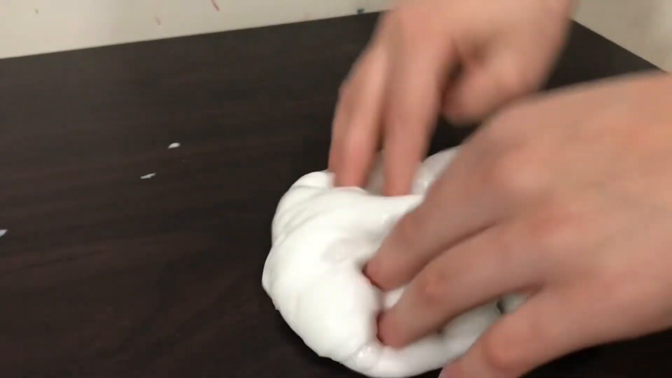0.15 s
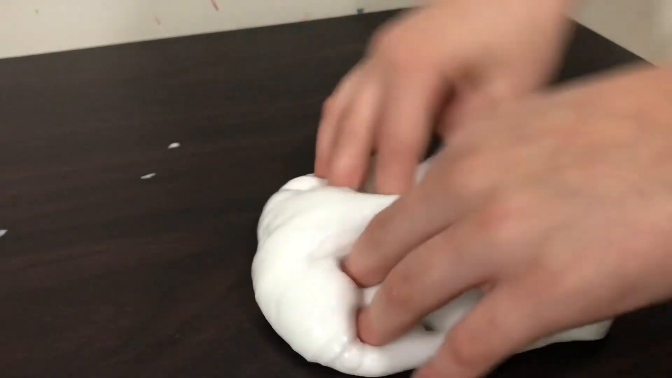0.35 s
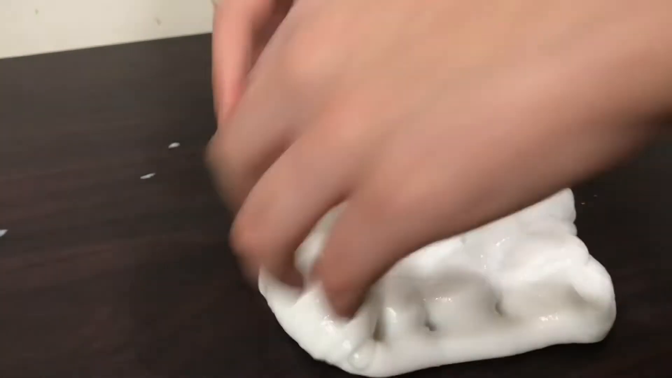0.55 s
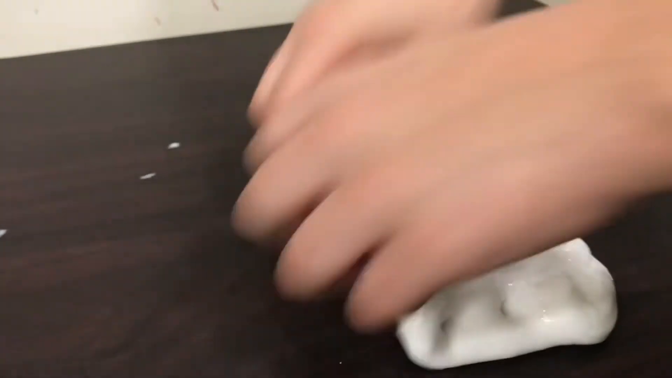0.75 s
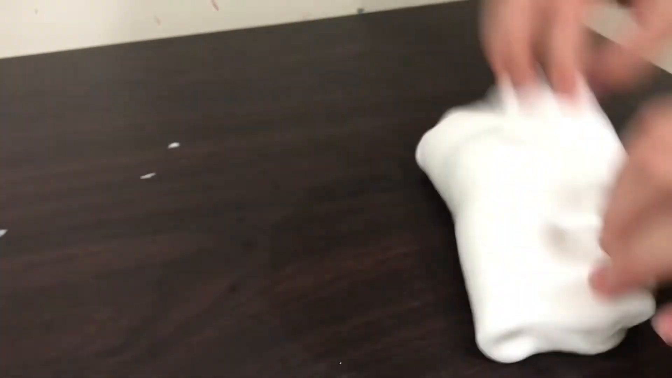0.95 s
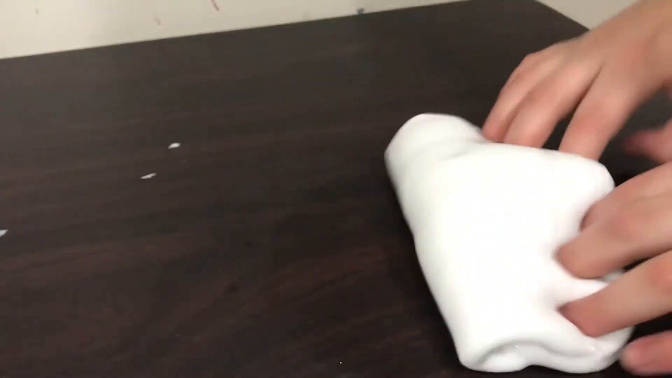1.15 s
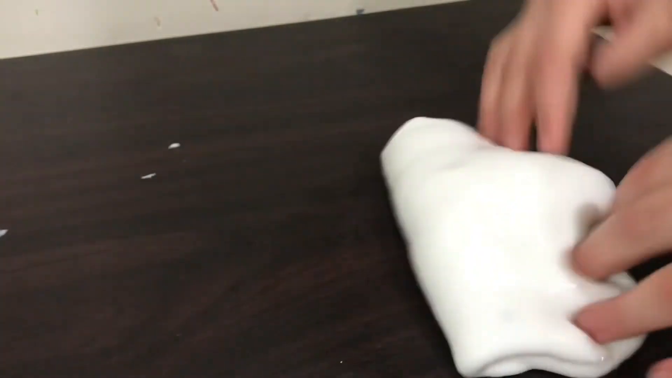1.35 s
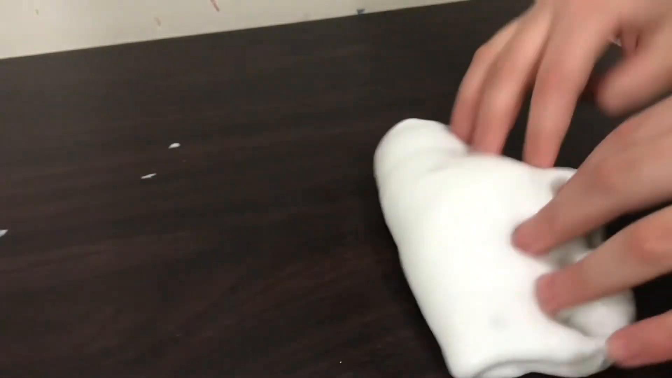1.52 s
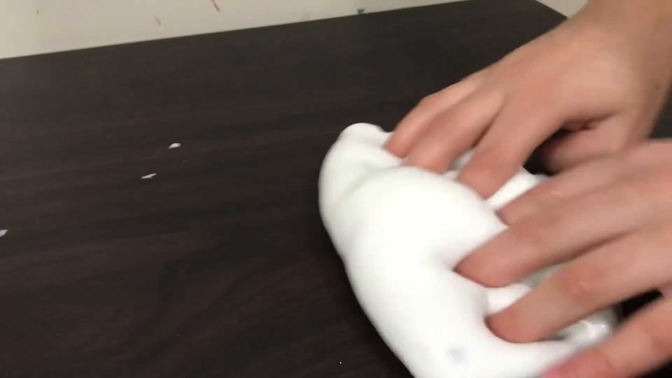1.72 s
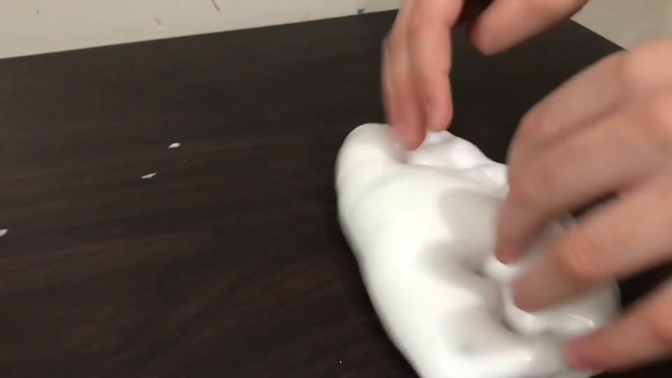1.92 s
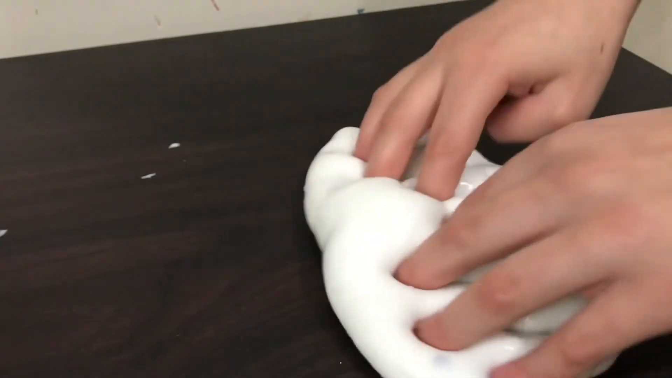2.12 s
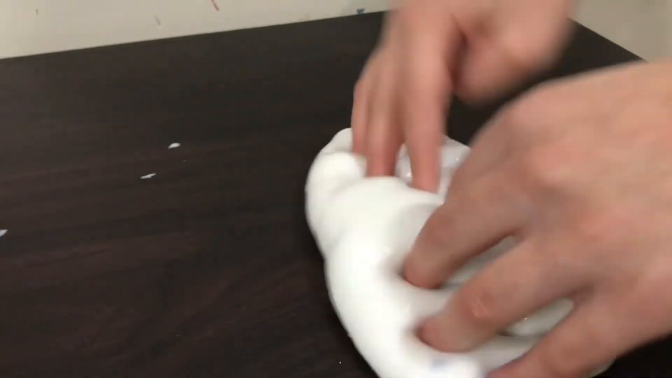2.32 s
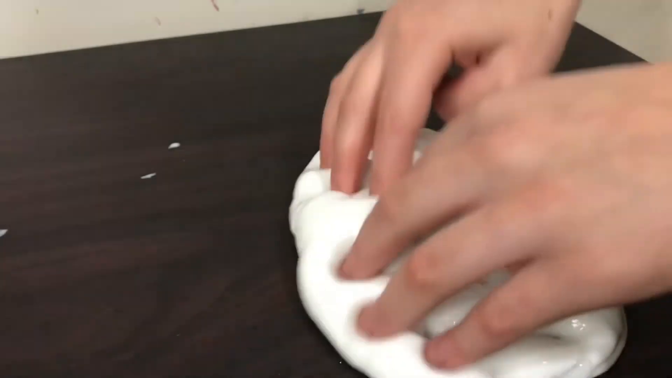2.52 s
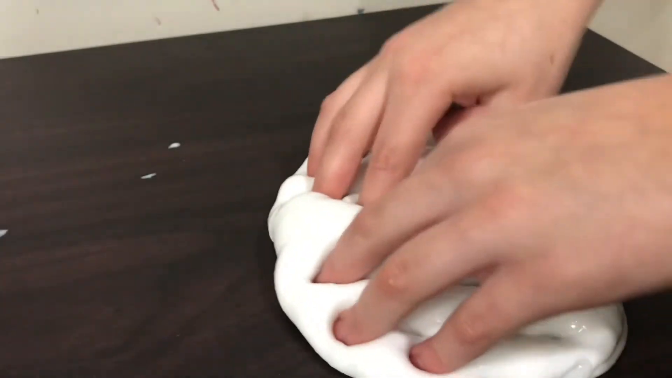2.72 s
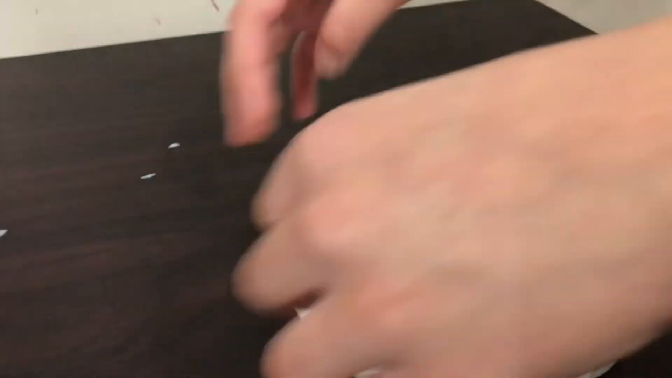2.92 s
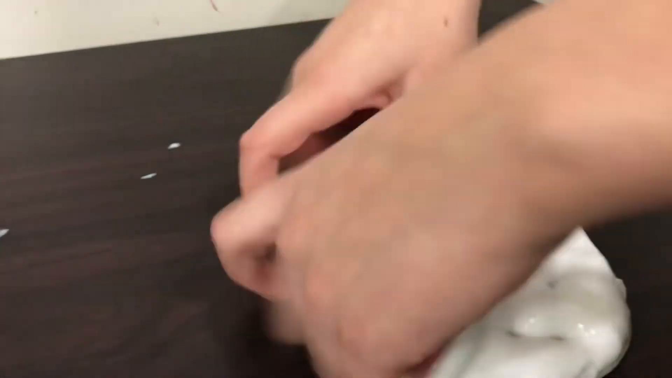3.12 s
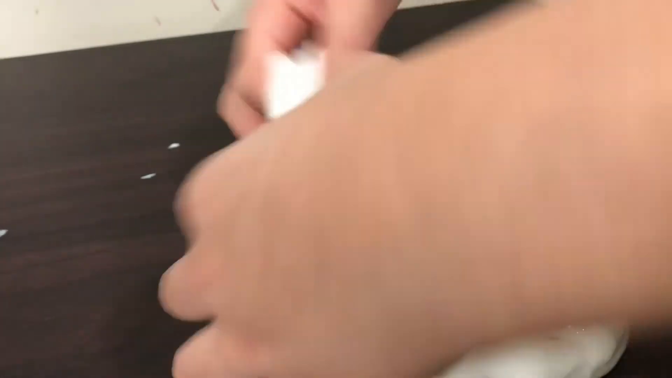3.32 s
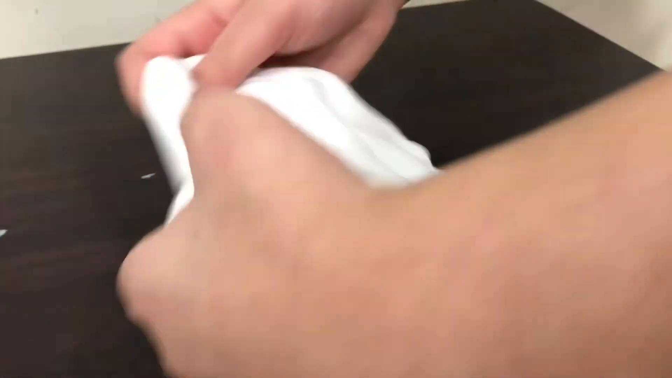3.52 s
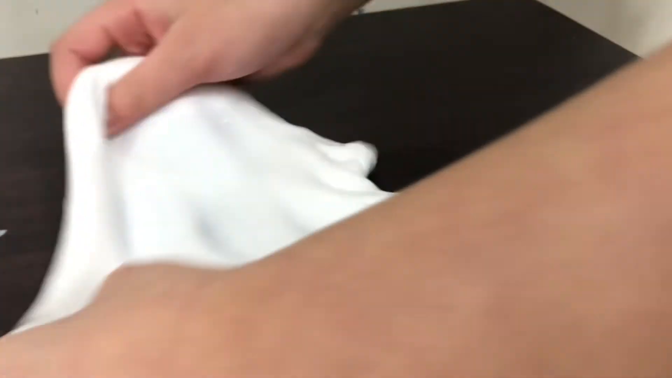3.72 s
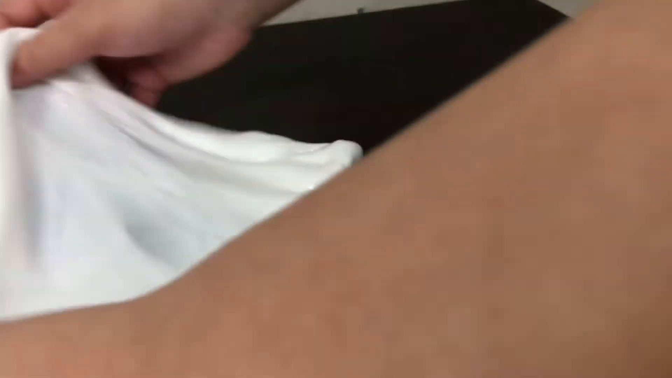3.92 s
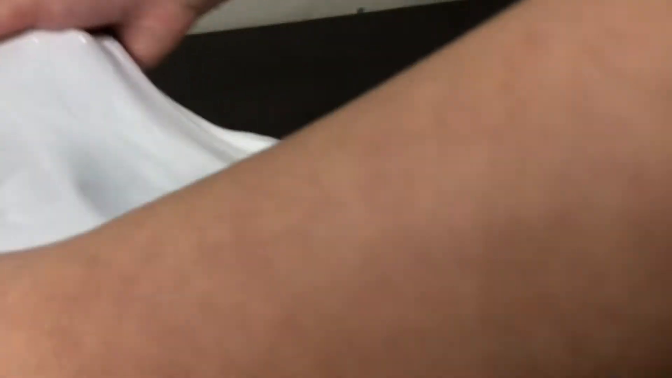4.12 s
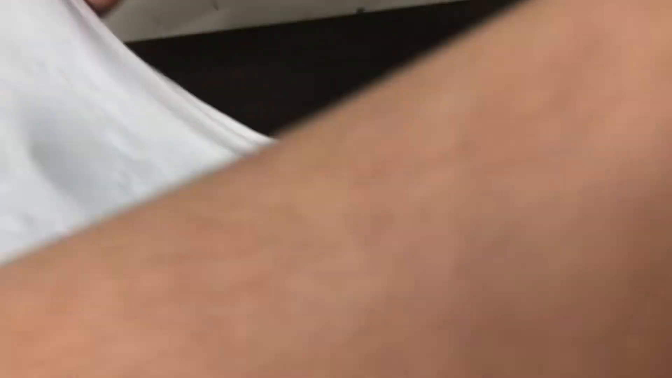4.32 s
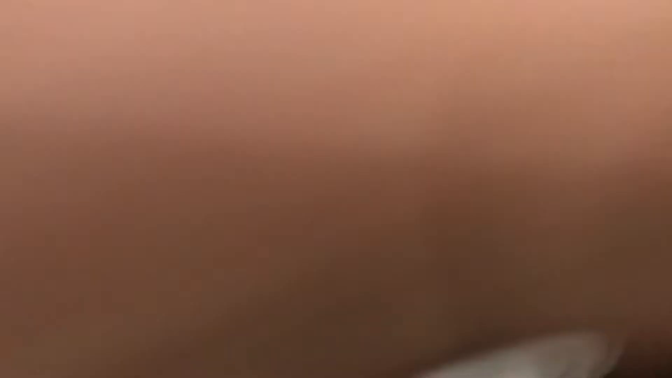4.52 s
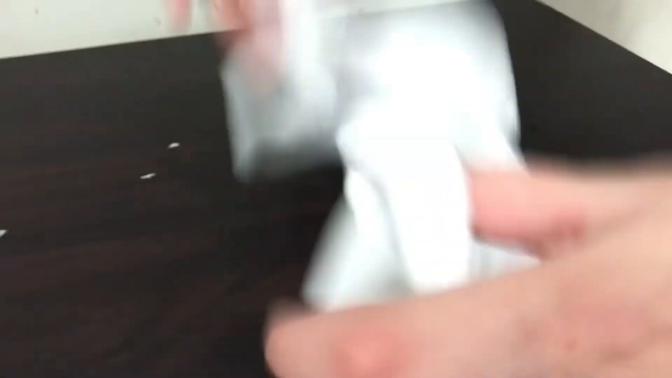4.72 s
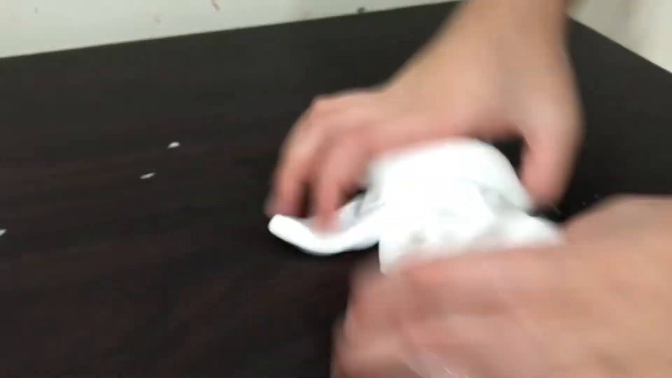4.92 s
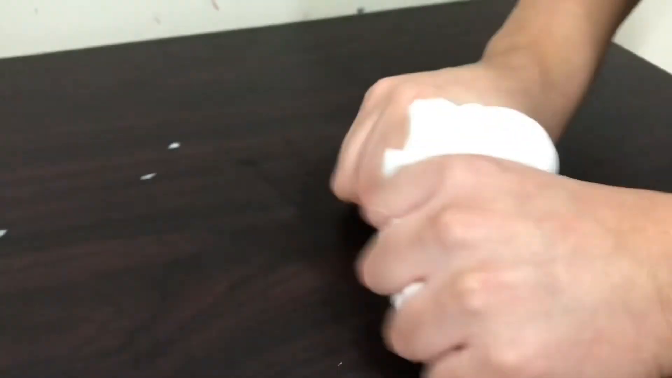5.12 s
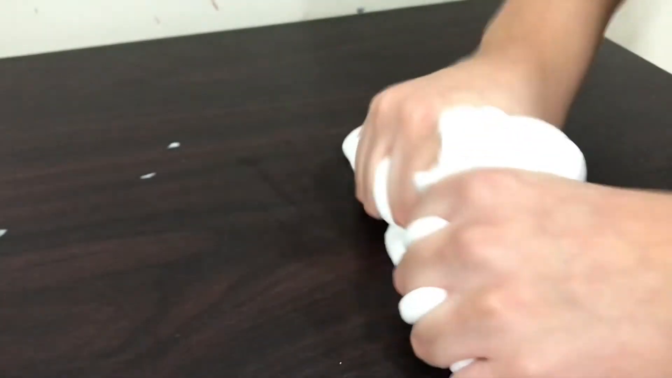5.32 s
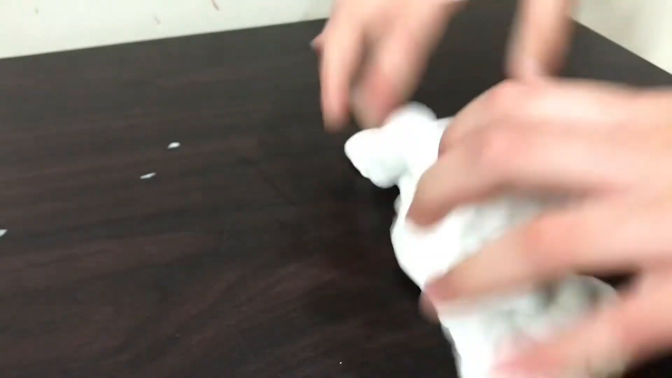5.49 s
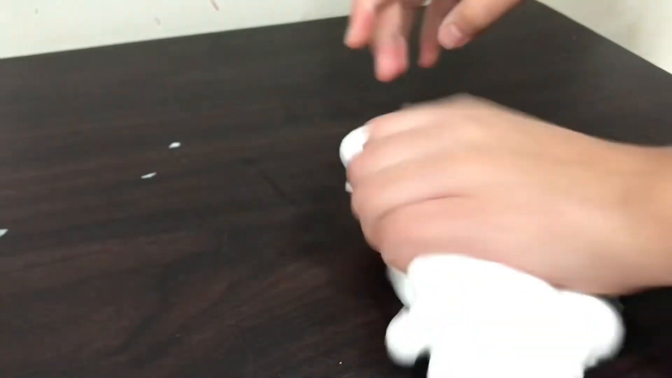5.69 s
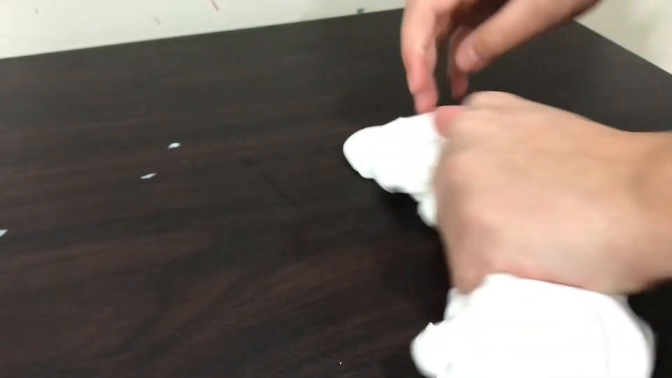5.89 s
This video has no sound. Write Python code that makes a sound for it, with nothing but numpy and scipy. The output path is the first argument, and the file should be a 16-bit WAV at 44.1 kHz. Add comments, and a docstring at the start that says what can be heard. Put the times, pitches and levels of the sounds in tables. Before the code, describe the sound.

Two hands work thick slime on a wooden table, close to the microphone in a small, slightly reverberant room. Regular pokes give brief clusters of wet pops with dull thuds. Softer bumps and a faint skin rustle follow, then a near-quiet stretch. Late squeezing brings a dense burst of sharp, snapping pops and crackle, then a few scattered clicks over low room rumble.

```python
"""Small room, wooden table: two hands poke, fold and squeeze thick slime.
Each press bursts a quick run of air pockets: damped sines under the noise of tearing, snapping film.
Cavities gurgle (sliding tone plus rasp), tiny bubbles crackle, strands snap, skin rustles and squeaks.
Fingertips, knuckles and the lump thud on the table: damped low sines with pats of noise.
A late squeeze crackles and brings the sharpest pops; room rumble and hiss lie underneath."""
import sys
import numpy as np
from scipy import signal
from scipy.fft import rfft, irfft
from scipy.io import wavfile

SR = 44100
rng = np.random.default_rng(int(sys.argv[2]) if len(sys.argv) > 2 else 0)


def store_wav(level_fs):
    """Save 16-bit WAV to argv[1]."""
    pcm = np.round(np.clip(np.atleast_2d(level_fs), -1, 1) * 32767)
    wavfile.write(sys.argv[1], SR, pcm.T.astype(np.int16))


N = 262395
TIME = np.arange(N) / SR
MS = SR / 1000  # samples per millisecond
CUTOFF_HZ = 16300

# Source levels are relative; scene() sets the balance of the layers.
# Bursts that stand out. Each row: start in seconds, pocket pitch in Hz, ring level in dB, film level in dB.
POCKET_BURSTS = [(.3935, 2430, -32, -35), (.397, 611, -37, -34), (.4137, 1450, -29, -27),
                 (.418, 1040, -24, -46), (.431, 2580, -25.5, -25.5), (.435, 1120, -23.5, -41),
                 (1.015, 1614, -41.5, -64), (1.027, 1520, -42, -80), (1.191, 1720, -38.5, -59),
                 (1.341, 2337, -31, -49), (1.3495, 1780, -32, -32.5), (1.353, 1090, -26.5, -52),
                 (1.376, 1190, -26.5, -48), (1.378, 482, -25.5, -38), (1.661, 1560, -42, -71),
                 (1.689, 1661, -45, -49.5), (1.839, 780, -26, -38), (1.8455, 3470, -30.5, -34),
                 (1.856, 3600, -38, -38), (1.872, 1080, -28, -37), (1.879, 1693, -30, -34.5),
                 (1.884, 930, -31, -33), (1.8955, 1144, -19.5, -29.5), (1.905, 2010, -30.5, -31),
                 (2.317, 1160, -24, -31), (2.3215, 1280, -27, -37), (2.33, 1150, -29, -36),
                 (2.343, 1210, -30.5, -37), (2.35, 1010, -32, -34), (2.3555, 1060, -24.5, -33),
                 (2.356, 3540, -32.5, -32.5), (2.365, 984, -22, -35), (2.376, 889, -26, -40),
                 (2.8105, 1086, -19.5, -29.5), (2.8235, 1340, -23, -36), (2.833, 1480, -35, -30.5),
                 (2.852, 3600, -35, -38), (2.855, 887, -27.5, -41), (2.8615, 1480, -23.5, -29.5),
                 (2.88, 2480, -32, -51), (2.887, 2570, -32, -51), (3.016, 900, -37, -55),
                 (3.46, 1290, -31.5, -37), (4.033, 1010, -46, -54), (4.7205, 1197, -36.5, -48),
                 (4.745, 2430, -36.5, -48), (4.766, 1220, -23, -25), (4.778, 2980, -34, -41),
                 (4.827, 2720, -40.5, -52), (4.931, 2360, -37, -58), (4.966, 1290, -34.5, -33),
                 (4.981, 1347, -27, -33.5), (5.028, 4080, -24, -36), (5.031, 2330, -29, -32),
                 (5.039, 1810, -35, -38), (5.065, 1200, -33, -34), (5.078, 1500, -25.5, -37),
                 (5.089, 1330, -26, -48), (5.095, 1950, -26, -27.5), (5.111, 1310, -30, -40),
                 (5.1173, 3640, -34, -29), (5.1246, 1970, -16.5, -20.5), (5.1355, 3890, -15, -17),
                 (5.148, 4240, -36, -31), (5.1666, 3570, -17.5, -11.5), (5.177, 3520, -34, -29),
                 (5.2425, 3770, -33, -38), (5.287, 3240, -42, -53), (5.318, 2100, -46, -64),
                 (5.366, 2470, -34, -39), (5.374, 1165, -21.5, -50), (5.38, 1700, -23, -41),
                 (5.408, 3892, -51, -34), (5.515, 3400, -46, -45), (5.707, 650, -40, -40),
                 (5.759, 2495, -29.5, -36), (5.778, 1420, -35, -24.5), (5.832, 1707, -39.5, -53)]
# Presses of the fingers into the slime. Each row: start in seconds, end in seconds, pocket level in dB,
# usual pocket pitch in Hz, crackle level in dB.
FINGER_PRESSES = [(.394, 0.433, -26, 1024, -41), (0.622, 0.669, -58, 910, -52),
                  (1.354, 1.387, -27.5, 1050, -46.5), (1.84, 1.861, -36, 709, -49),
                  (1.873, 1.913, -31, 890, -43.5), (2.315, 2.378, -34.5, 860, -44.5),
                  (2.821, 2.868, -40, 1268, -51), (4.756, 4.785, -37.5, 1300, -40),
                  (4.969, 5.044, -42, 1500, -45.5), (5.054, 5.162, -37, 1470, -40.5),
                  (5.367, 5.391, -27, 1460, -41), (5.761, 5.787, -35, 1696, -45)]
# Strands of sticky film snapping without a ring. Each row: start in seconds, lowest pitch in Hz, level in dB.
STRAND_SNAPS = [(.384, 2400, -45), (0.43, 7000, -32), (.7904, 8100, -57), (.893, 1900, -49),
                (.952, 1600, -52.5), (1.192, 1610, -41), (2.374, 6500, -36), (2.8103, 7050, -29),
                (2.8598, 7620, -34), (2.881, 7200, -23.5), (3.033, 1900, -52), (3.103, 1700, -43),
                (3.154, 6000, -42.5), (3.782, 7000, -52), (4.032, 1310, -52), (4.7214, 1278, -35),
                (4.992, 3500, -33), (5.015, 7000, -37), (5.0575, 4970, -36), (5.1495, 11000, -33),
                (5.177, 4000, -28), (5.181, 7000, -33), (5.211, 5516, -32), (5.7064, 4500, -40.5),
                (5.76, 1300, -30), (5.778, 8500, -27), (5.79, 9000, -37), (5.835, 10000, -45),
                (5.8496, 10000, -39.5)]
# Air squeezed through a cavity that changes its size. Each row: start in seconds, length in seconds,
# first pitch in Hz, last pitch in Hz, level in dB.
CAVITY_GURGLES = [(0.393, 0.021, 549, 482, -31.5), (1.338, 0.0136, 2640, 2200, -39.5),
                  (1.354, 0.027, 1250, 1025, -32.5), (1.385, 0.016, 520, 665, -35.5),
                  (1.902, 0.014, 2104, 1830, -35), (1.906, .018, 643, 555, -34),
                  (2.365, 0.017, 700, 547, -35.5), (2.832, 0.017, 1300, 1080, -27),
                  (2.851, 0.0164, 1207, 1610, -31), (4.793, 0.018, 1550, 1840, -41),
                  (4.969, 0.016, 1910, 1640, -36), (4.98, 0.021, 510, 570, -40.5),
                  (5.122, 0.0229, 540, 796, -31), (5.15, 0.0216, 1263, 1115, -27)]
# Fingertips, hands and lump landing on the table. Each row: start in seconds, pitch in Hz, level in dB.
TABLE_THUDS = [(0.394, 334, -22), (0.413, 377, -25), (.434, 248, -23.5), (.626, 205, -16), (.636, 179, -14),
               (.652, 140, -15), (0.659, 125, -22), (.672, 120, -28), (1.341, 325, -35.5),
               (1.352, 410, -27.5), (1.377, 327, -26), (1.848, 181, -24.5), (1.877, 294, -27),
               (1.896, 381.8, -35), (2.323, 384.8, -22), (2.348, 277, -31), (2.37, 366, -26.5),
               (2.811, 410, -26.5), (2.8354, 310, -20.5), (2.884, 194, -27.5), (2.994, 125, -26),
               (3.016, 216, -19), (3.034, 180, -20), (3.04, 79.6, -22.5), (3.104, 243, -23),
               (3.109, 88, -22), (3.119, 192, -29.5), (3.184, 195, -35), (4.032, 200, -36),
               (4.767, 262, -18), (4.782, 71.5, -21.5), (4.906, 260.4, -30.5), (5.001, 76.5, -23.5),
               (5.022, 294, -26), (5.094, 427, -29), (5.124, 500, -25), (5.377, 194, -21.5),
               (5.672, 92, -31.5)]
# Skin sliding over the slime and peeling off. Each row: start in seconds, end in seconds, rustle level in dB,
# sticky crackle level in dB.
SKIN_SLIDES = [(0.369, 0.394, -56, -60), (1.327, 1.347, -56, -63), (1.822, 1.842, -58, -64),
               (0.661, 1.047, -74, -76.5), (2.983, 3.236, -56, -63.5), (3.242, 3.636, -70, -73),
               (3.766, 4.187, -82, -80), (4.68, 4.859, -58, -61), (4.907, 4.991, -56, -55),
               (5.165, 5.386, -60, -69), (5.351, 5.439, -40, -49), (5.461, 5.868, -63.5, -67)]
# Colour of the sliding. Each row: frequency in Hz, relative density in dB per Hz.
RUSTLE_COLOUR = [(300, 8), (1200, 3.5), (2500, 0.5), (3800, 0.5), (6000, -7), (7500, -20), (15000, -13)]
# Resonances of the board under the slime. Each row: frequency in Hz, width in Hz, relative level in dB.
BOARD_MODES = [(545.5, 61, -2), (669, 18, -5.5), (1940, 620, -20), (3230, 350, -13.5), (3830, 190, -11.5),
               (5500, 1000, -11.5)]
# Room decay. Each row: frequency in Hz, T60 in seconds.
ROOM_DECAY = [(100, 0.3), (200, 0.62), (400, 0.71), (1000, 0.67), (2800, 0.62), (7000, 0.37), (15000, 0.26)]
# Strength of the reverberation. Each row: frequency in Hz, level in dB.
ROOM_STRENGTH = [(60, -1), (190, -9.5), (400, -10.5), (1000, -15), (3000, -15), (6000, -10), (15000, -16)]
# Low room resonances, stirred by rumble and thuds. Each row: frequency in Hz, width in Hz, relative level in dB.
ROOM_MODES = [(69, 80, -55), (119, 6.6, -59.5), (188, 12.7, -55), (318, 180, -64.5)]
# Colour of the steady rumble and hiss. Each row: frequency in Hz, relative density in dB per Hz.
AIR_COLOUR = [(15, -58), (25, -21), (48, -2), (130, -1), (161, -8.5), (195, -1.5), (229, -12), (285, -1.5),
              (405, -9), (1100, -26), (1230, -32), (1610, -29.5), (2000, -32.5), (2760, -34.5),
              (16000, -49.5)]
# Colour of the echo of an earlier press. Each row: frequency in Hz, relative density in dB per Hz.
LINGER_COLOUR = [(100, 11.5), (600, 0.5), (1200, -4.5), (2200, -8), (4000, -18.5), (8000, -29),
                 (16000, -38)]

# run of bursts inside a press
POCKET_GAP_S, POCKET_SPREAD_OCTAVES, POCKET_SPREAD_DB = .011, 0.273, 2.5
PRESS_CLIMB_OCTAVES, PRESS_SWELL_DB = 0.04, 0.5
# film level relative to the ring of a 1 kHz pocket
POCKET_FILM_DB, FILM_SPREAD_DB, FILM_DB_PER_OCTAVE = -25, 3, 20.5
SMACK_DB, PAT_DB = 1, -4  # goo beside a ring (faint pockets less), flesh beside a thud
PRESS_TILT_DB_PER_OCTAVE, PEEL_TILT_DB_PER_OCTAVE = -4, -0.5  # crackle inside the lump, at its surface
SQUEAK_START_S, SQUEAK_END_S, SQUEAK_HZ, SQUEAK_WIDTH_HZ, SQUEAK_DB = 3.1, 3.69, 1670, 100, -67.5
DELAY_JITTER_S = .00006  # spread of the random delay that smooths the reverberation
AIR_DB, LINGER_DB, LINGER_T60_S = -51.5, -39.5, 0.68


def from_db(db):
    """Decibels to gain."""
    return 10 ** (np.asarray(db) / 20)


def rms_one(x):
    """Scale to rms 1."""
    return x / np.sqrt(np.mean(x ** 2) + 1e-20)


def unit_burst(x):
    """Scale to the energy of one millisecond at rms 1."""
    return x * np.sqrt(MS / (np.sum(x ** 2) + 1e-20))


def at_hz(points, hz):
    """Read a table on a log-frequency axis."""
    known_hz, values = np.transpose(points)
    return np.interp(np.log(np.maximum(hz, 1)), np.log(known_hz), values)


def band(x, low_hz, high_hz, order=2):
    """Causal band-pass."""
    edges_hz = [low_hz, min(high_hz, .47 * SR)]
    return signal.sosfilt(signal.butter(order, edges_hz, "band", fs=SR, output="sos"), x + 1e-18)


def resonate(x, hz, width_hz):
    """One resonance with gain 1 at its peak."""
    r = np.exp(-np.pi * width_hz / SR)
    zeros = np.array([1, 0, -1]) * (1 - r * r) / 2
    poles = [1, -2 * r * np.cos(2 * np.pi * hz / SR), r * r]
    return signal.lfilter(zeros, poles, x + 1e-18)


def noise(colour):
    """Steady noise of the given colour, rms 1."""
    white = rfft(rng.standard_normal(N))
    hz = np.arange(len(white)) * SR / N
    return rms_one(irfft(white * from_db(at_hz(colour, hz)), N))


def add(track, start_s, sound):
    """Mix a sound into the track at start_s."""
    start = int(start_s * SR)
    track[start:start + len(sound)] += sound[:N - start]


def swell(start_s, end_s):
    """Pressure of one stroke: it builds and lets go."""
    n = int(max(end_s - start_s, .01) * SR)
    return np.sqrt(np.sin(np.pi * (np.arange(n) + .5) / n))


def ring(t, hz, decay_s, rise_s, glide):
    """Damped sine whose pitch slides by the share glide as it dies."""
    pitch_hz = hz * (1 + glide * (.5 - np.exp(-t / decay_s)))
    envelope = np.exp(-t / decay_s) * (1 - np.exp(-t / rise_s))
    return unit_burst(np.sin(2 * np.pi * np.cumsum(pitch_hz) / SR) * envelope)


def rupture(t, length_s, violence=0, grain_db=2.0):
    """A film gives way at t = 0 and its rips fade; violence shortens the swell and strengthens the crack."""
    rips = rng.standard_normal(len(t)) * from_db(grain_db * rng.standard_normal(len(t)))
    swell_s = length_s * (.35 - .3 * violence)
    rips = unit_burst(rips * np.exp(-np.abs(t) / np.where(t < 0, swell_s, length_s)))
    rips[np.argmin(np.abs(t))] += np.sqrt(MS) * (.25 + .55 * violence)
    return rips


def press_pockets(count=24):
    """Small pockets burst at uneven gaps during a press, slightly higher and louder on average towards its end."""
    rows = []
    for start_s, end_s, level_db, usual_hz, _ in FINGER_PRESSES:
        s = start_s + POCKET_GAP_S * (np.arange(count) + .5 * rng.random(count))
        pitch, strength, film = np.clip(rng.standard_normal((3, count)), -2, 2)
        progress = (s - start_s) / (end_s - start_s)
        climb_octaves = PRESS_CLIMB_OCTAVES * (np.minimum(progress, 1) - .5)
        hz = usual_hz * 2 ** (POCKET_SPREAD_OCTAVES * pitch + climb_octaves)
        ring_db = level_db + POCKET_SPREAD_DB * strength + PRESS_SWELL_DB * progress
        # small, high pockets lie near the surface and snap more brightly
        film_db = ring_db + POCKET_FILM_DB + FILM_DB_PER_OCTAVE * np.log2(hz / 1000) + FILM_SPREAD_DB * film
        rows += list(np.transpose([s, hz, ring_db, film_db])[s < end_s])
    return rows


def pops(decay_at_1khz_s=0.0046, rise_s=0.00017, glide=0.11, glide_spread=0.25, tear_s=0.0035,
         soft_top_hz=4300, hard_top_hz=6000, soft_tear_db=-1.0, hard_tear_db=-3.5,
         snap_db=-3.0, snap_low_hz=7900, snap_spread_octaves=0.33, lead_s=.006):
    """A pocket rings at its own pitch, rising on average, small ones more briefly, under its bursting film."""
    out, t = np.zeros(N), TIME[:int(30 * MS)]
    for s, hz, ring_db, film_db in list(POCKET_BURSTS) + press_pockets():
        # loud films burst more abruptly; their tear reaches higher but is weaker relative to the film level
        violence = np.interp(film_db, [-33, -14], [0, 1])
        tear_top_hz = soft_top_hz + violence * (hard_top_hz - soft_top_hz)
        tear_db = soft_tear_db + violence * (hard_tear_db - soft_tear_db)
        decay_s = decay_at_1khz_s * np.sqrt(1000 / hz)
        pocket = ring(t, hz, decay_s, rise_s, glide + glide_spread * rng.standard_normal())
        # the jolted goo smacks in a wide band around the pitch
        smack = unit_burst(band(rupture(t - lead_s, decay_s, violence), hz / 3.06, hz * 1.6, order=3))
        film = rupture(t - lead_s, tear_s, violence)
        tear = unit_burst(band(film, 1310, tear_top_hz, order=4))
        # each film snaps in a treble band of its own
        snap_hz = snap_low_hz * 2 ** (snap_spread_octaves * rng.uniform(-1.33, 1))
        snap = unit_burst(band(film, min(snap_hz, 13000), 2 * snap_hz))
        # faint pockets hardly jolt the goo and ring more purely
        smack_db = SMACK_DB + np.interp(ring_db, [-44, -30], [-7, 0])
        burst = from_db(ring_db + smack_db) * smack
        burst = burst + from_db(film_db + tear_db) * tear
        burst = burst + from_db(film_db + snap_db) * snap
        add(out, s, from_db(ring_db) * pocket)
        add(out, s - lead_s, burst)
    return out


def crackle(strokes, tilt_db_per_octave, bubbles_per_s, size_db=6.0, cycles=3.45, low_hz=800, high_hz=4200,
            rise_s=.0001, glide=0.34, tick_db=-8.0, tick_s=0.00059, count=16):
    """Tiny bubbles collapse at random under each stroke: each ticks broadly and rings for a few cycles."""
    out, t = np.zeros(N), TIME[:int(20 * MS)]
    blips = []
    for hz in np.geomspace(low_hz, high_hz, count):
        tick = unit_burst(band(rupture(t, tick_s), 2500, 8500))
        blips.append(ring(t, hz, cycles / hz, rise_s, glide) + from_db(tick_db) * tick)
    for start_s, end_s, level_db in strokes:
        pressure = swell(start_s, end_s)
        shape = (count, len(pressure))
        born = rng.random(shape) < bubbles_per_s * pressure / count / SR
        sizes = from_db(size_db * np.minimum(rng.exponential(1, shape), 3)) * rng.choice([-1, 1], shape)
        fizz = sum(signal.fftconvolve(clicks * pressure, blip) for clicks, blip in zip(born * sizes, blips))
        # bubbles buried deep in the lump sound duller
        octaves = np.log2(np.maximum(np.fft.rfftfreq(len(fizz), 1 / SR), low_hz) / low_hz)
        tilted = irfft(rfft(fizz) * from_db(tilt_db_per_octave * octaves))
        add(out, start_s, from_db(level_db) * rms_one(tilted))
    return out


def gurgles(flutter_s=0.00179, flutter_db=3.5, waver=0.07, rasp=0.54):
    """Escaping air rings a cavity; pitch slides as the fingers reshape it, its wet neck flutters and rasps."""
    out = np.zeros(N)
    for s, length_s, first_hz, last_hz, level_db in CAVITY_GURGLES:
        flow = swell(s, s + length_s)
        t = TIME[:len(flow)]
        loud, bend = (np.interp(t / flutter_s, np.arange(40), steps) for steps in rng.standard_normal((2, 40)))
        pitch_hz = np.geomspace(first_hz, last_hz, len(t)) * (1 + waver * bend)
        tone = rms_one(np.sin(2 * np.pi * np.cumsum(pitch_hz) / SR))
        hiss = rng.standard_normal(len(t))
        sputter = rms_one(band(hiss, pitch_hz.min() / np.sqrt(2), pitch_hz.max() * np.sqrt(2)))
        voice = flow * from_db(flutter_db * loud) * (tone + rasp * sputter)
        add(out, s, from_db(level_db) * rms_one(voice))
    return out


def snaps(length_s=0.0013, violence=0.55, span_octaves=1.63):
    """A thin strand parts with one crack and a very short fizz; the finer the strand, the higher its band."""
    out, t = np.zeros(N), TIME[:int(12 * MS)]
    for s, low_hz, level_db in STRAND_SNAPS:
        top_hz = min(low_hz * 2 ** span_octaves, CUTOFF_HZ)
        fizz = band(rupture(t, length_s, violence), low_hz, top_hz, order=3)
        add(out, s, from_db(level_db) * unit_burst(fizz))
    return out


def thuds(cycles=0.78, rise_s=0.000043, glide=-0.4, flesh_s=0.0078, flesh_low_hz=100, flesh_top_hz=260,
          slap_s=0.0053, slap_low_hz=290, slap_top_hz=640, slap_db=-11,
          skin_s=0.0066, skin_top_hz=3000, skin_db=-24, sway_hz=72, sway_db=-15):
    """A blow rocks the table briefly and sways its frame, with a pat of flesh, a wet slap and a tick of skin."""
    out, t = np.zeros(N), TIME[:int(120 * MS)]
    for s, hz, level_db in TABLE_THUDS:
        pat = unit_burst(band(rupture(t, flesh_s), flesh_low_hz, flesh_top_hz, order=3))
        slap = unit_burst(band(rupture(t, slap_s), slap_low_hz, slap_top_hz))
        skin = unit_burst(band(rupture(t, skin_s, violence=0.94), slap_top_hz, skin_top_hz))
        contact = from_db(PAT_DB) * pat + from_db(slap_db) * slap + from_db(skin_db) * skin
        knock = ring(t, hz, cycles / hz, rise_s, glide)
        sway = from_db(sway_db) * ring(t, sway_hz, 1 / sway_hz, flesh_s, glide)
        add(out, s, from_db(level_db) * (knock + contact + sway))
    return out


def slides():
    """Skin rubbing along the slime: a soft continuous rustle of coloured noise."""
    force = np.zeros(N)
    for start_s, end_s, level_db, _ in SKIN_SLIDES:
        add(force, start_s, from_db(level_db) * swell(start_s, end_s) ** 2)
    return force * noise(RUSTLE_COLOUR)


def squeak(catch_s=.02, catch_db=-0.5):
    """Skin dragging on the stretched slime sings faintly in one narrow band, its level wavering slightly."""
    force = np.zeros(N)
    add(force, SQUEAK_START_S, swell(SQUEAK_START_S, SQUEAK_END_S))
    grip = np.interp(TIME / catch_s, np.arange(2000), rng.standard_normal(2000))
    voice = resonate(rng.standard_normal(N), SQUEAK_HZ, SQUEAK_WIDTH_HZ)
    return from_db(SQUEAK_DB) * force * rms_one(voice * from_db(catch_db * np.clip(grip, -2, 1)))


def table_top(x, ring_db=9.5):
    """The board's resonances ring along with the slime."""
    modes = sum(from_db(db) * resonate(x, hz, width_hz) for hz, width_hz, db in BOARD_MODES)
    return x + from_db(ring_db) * modes


def room(x, build_s=0.0029, count=10):
    """Diffuse reflections build up quickly and die away at a rate of their own in each band."""
    t, response = TIME[:SR * 3 // 4], 0
    edges_hz = np.geomspace(45, 18000, count + 1)
    for low_hz, high_hz in zip(edges_hz, edges_hz[1:]):
        hz = np.sqrt(low_hz * high_hz)
        fade = from_db(-60 * t / at_hz(ROOM_DECAY, hz)) * (1 - np.exp(-(t / build_s) ** 2))
        tail = band(rng.standard_normal(len(t)), low_hz, high_hz) * fade
        # energy in proportion to bandwidth
        scale = np.sqrt(2 * (high_hz - low_hz) / SR / np.sum(tail ** 2))
        response = response + tail * from_db(at_hz(ROOM_STRENGTH, hz)) * scale
    return signal.fftconvolve(x, response)[:N]


def smooth_room(x, count=4):
    """Four diffuse room tails, each fed with a slightly randomly jittered delay, blend into one smooth reverb."""
    def jittered():
        """The sound with its delay wandering every millisecond."""
        steps = rng.standard_normal(int(N / MS) + 2)
        jitter = np.interp(np.arange(N) / MS, np.arange(len(steps)), steps)
        return np.interp(TIME - DELAY_JITTER_S * jitter, TIME, x)
    return sum(room(jittered()) for _ in range(count)) / np.sqrt(count)


def background():
    """Room rumble and hiss, a few booming resonances, and the dying echo of an earlier press."""
    drone = 0
    for hz, width_hz, db in ROOM_MODES:
        settled = resonate(rng.standard_normal(N + SR), hz, width_hz)[SR:]
        drone = drone + from_db(db) * rms_one(settled)
    linger = from_db(LINGER_DB - 60 * TIME / LINGER_T60_S) * noise(LINGER_COLOUR)
    return from_db(AIR_DB) * noise(AIR_COLOUR) + band(drone, 40, 440) + linger


def scene(pop_db=-4.5, gurgle_db=-6.0, snap_db=-4.5, thud_db=2.5, boom_db=-20.0, boom_delay_s=0.061):
    """Slime and table close to the microphone, the room around them."""
    press_strokes = [(start_s, end_s, db) for start_s, end_s, *_, db in FINGER_PRESSES]
    peel_strokes = [(start_s, end_s, db) for start_s, end_s, _, db in SKIN_SLIDES]
    crushed = crackle(press_strokes, PRESS_TILT_DB_PER_OCTAVE, bubbles_per_s=1000)
    peeled = crackle(peel_strokes, PEEL_TILT_DB_PER_OCTAVE, bubbles_per_s=330)
    bursts = from_db(pop_db) * pops() + from_db(gurgle_db) * gurgles() + from_db(snap_db) * snaps()
    slime = table_top(bursts + crushed + peeled)
    blows = from_db(thud_db) * thuds()
    rustle = slides() + squeak()
    # standing waves need a trip across the room before they boom
    late_blows = np.interp(TIME - boom_delay_s, TIME, blows)
    boom = sum(resonate(late_blows, hz, width_hz) for hz, width_hz, _ in ROOM_MODES)
    direct = slime + blows + rustle
    echoes = smooth_room(slime) + room(blows + rustle)
    return (direct + echoes + from_db(boom_db) * boom + background())[None]


def record(dry, dip_hz=4600, dip_width_hz=600, dip_depth=0.31):
    """The microphone drops the deepest bass and has a narrow dip in the treble; the top is cut."""
    thin = signal.sosfilt(signal.butter(4, 55, "high", fs=SR, output="sos"), dry)
    coloured = thin - dip_depth * resonate(thin, dip_hz, dip_width_hz)
    return signal.sosfilt(signal.ellip(10, .1, 80, CUTOFF_HZ, fs=SR, output="sos"), coloured)


dry = scene()
out = record(dry)
store_wav(out)
```